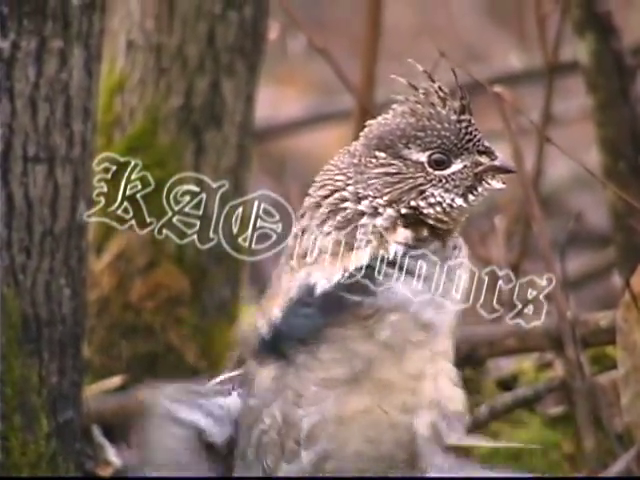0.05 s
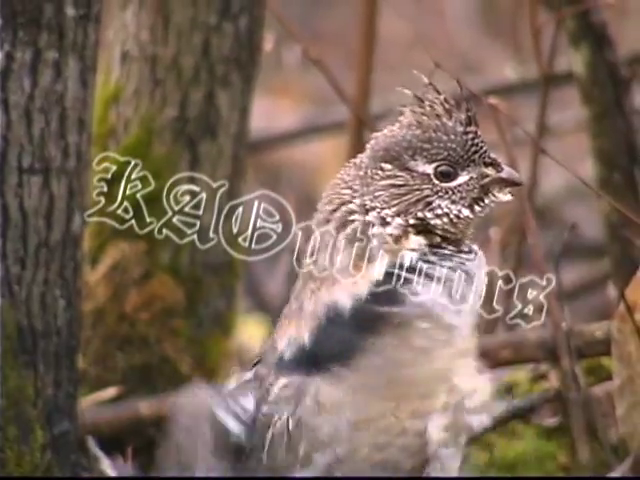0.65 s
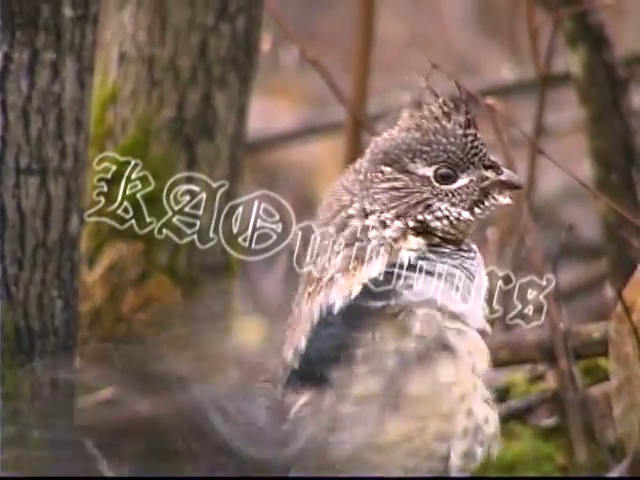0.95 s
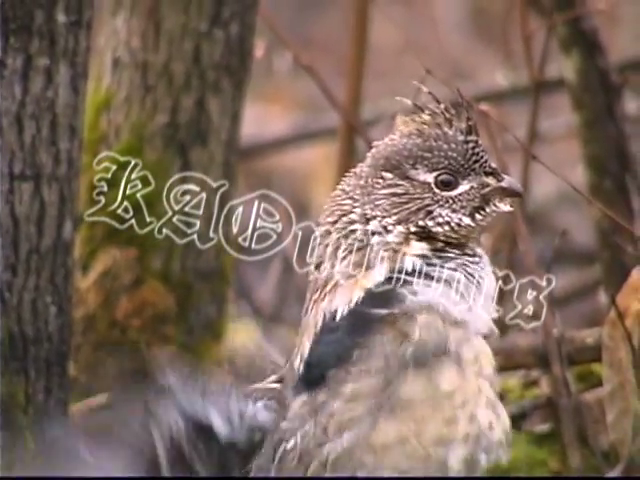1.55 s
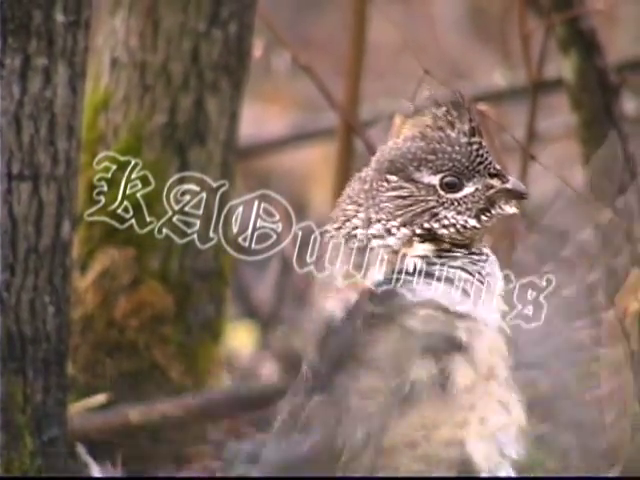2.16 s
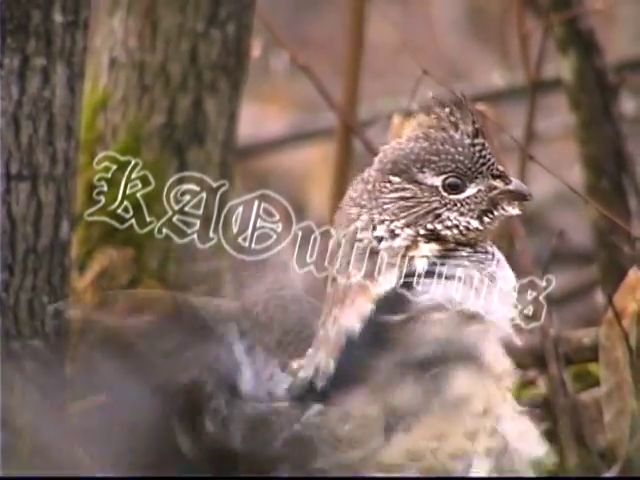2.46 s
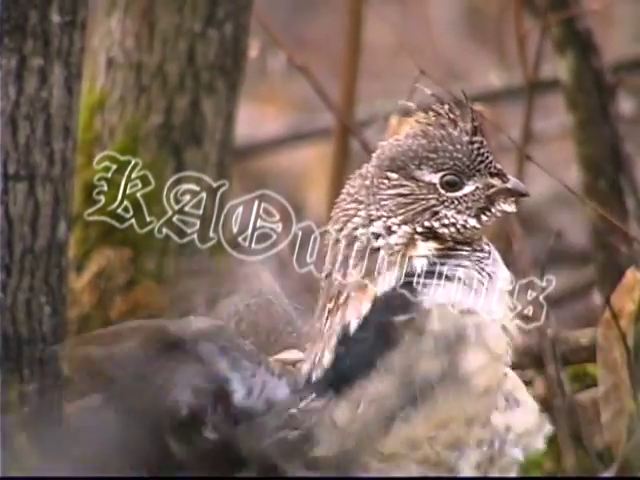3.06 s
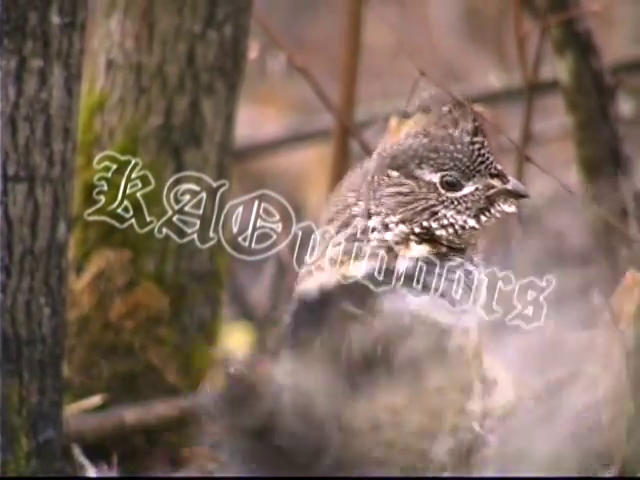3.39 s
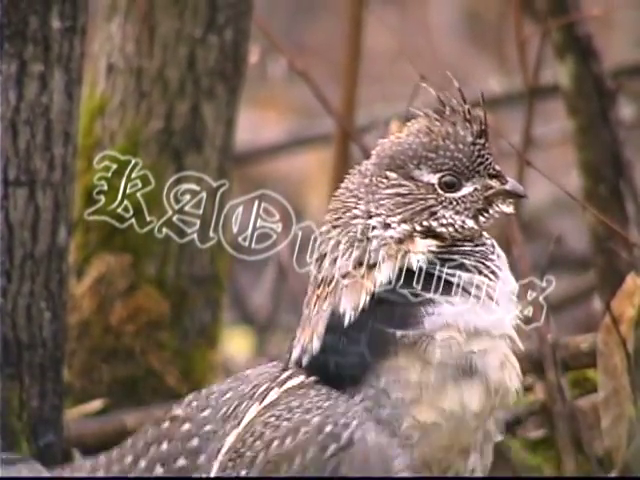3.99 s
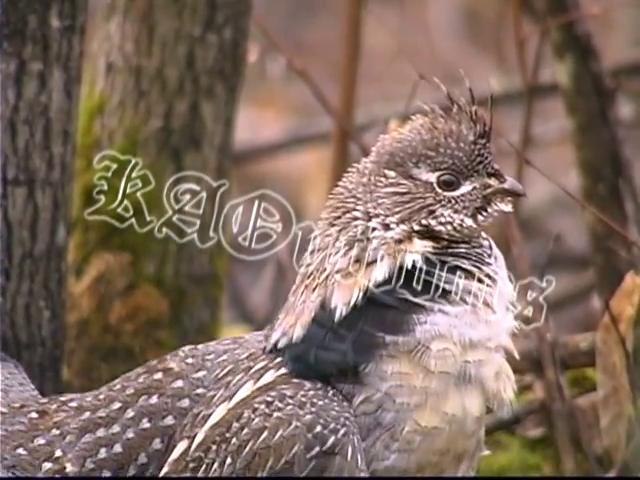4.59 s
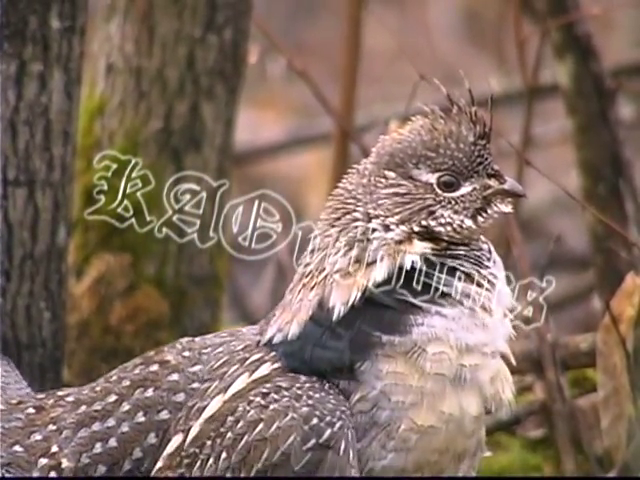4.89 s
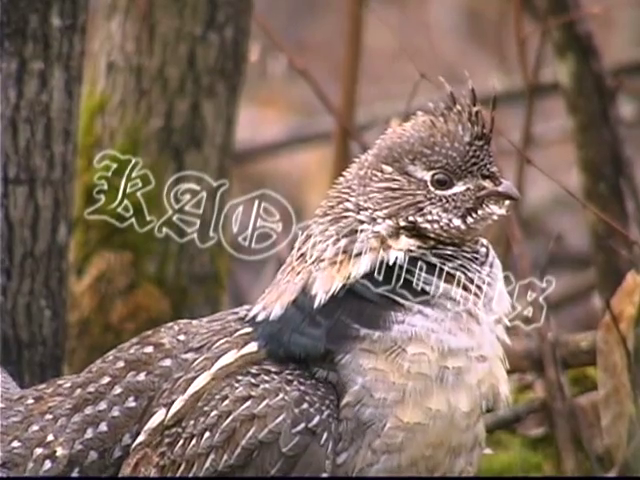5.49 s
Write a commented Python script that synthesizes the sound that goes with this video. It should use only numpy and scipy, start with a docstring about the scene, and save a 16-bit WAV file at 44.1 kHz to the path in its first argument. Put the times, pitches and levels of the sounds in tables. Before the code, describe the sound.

Low, spaced wing thumps with feathery swishes and slaps quicken into a whirring roll and stop, leaving a soft forest hush.

```python
"""A grouse drumming on a log

The bird is close by, a little to the right, in quiet woodland. Each wing stroke shoves the air into
a low thump, sheds a short swirl and hisses through the feathers; the wide, slow strokes end in a slap.
The beats speed into a whir, slow down and stop. Quills and dry leaves tick; trees echo faintly."""
import sys
import numpy as np
from scipy import signal
from scipy.fft import rfft, irfft
from scipy.io import wavfile
from scipy.ndimage import uniform_filter1d

SR = 44100
rng = np.random.default_rng(int(sys.argv[2]) if len(sys.argv) > 2 else 0)


def persist_wave(psi):
    """Save psi, clipped to +-1, as 16-bit WAV."""
    counts = np.round(np.clip(psi, -1, 1) * 32767).astype(np.int16)
    wavfile.write(sys.argv[1], SR, np.atleast_2d(counts).T)


N = 244314


def gain_of(db):
    """Turns decibels into a number to multiply a sound by."""
    return 10 ** (np.asarray(db) / 20)


def evened(x):
    """Scales a signal to an average (rms) size of one."""
    return x / np.sqrt(np.mean(x ** 2) + 1e-20)


def look_up(table, hz):
    """Reads a table at any frequency, sliding between its rows on a log scale."""
    row_hz, value = np.transpose(table)
    return np.interp(np.log(hz + 1), np.log(row_hz + 1), value)


def add(mix, start_s, sound):
    """Mixes a sound in at the given time."""
    part = mix[max(round(start_s * SR), 0):][:len(sound)]
    part += sound[:len(part)]


def bell(t, width):
    """A smooth hump around time zero."""
    return np.exp(-.5 * (t / width) ** 2)


def stereo_noise(tone, likeness):
    """Noise shaped by a tone table; a likeness of 1 makes left and right the same."""
    hz = np.fft.rfftfreq(N, 1 / SR)
    right, other = rfft(rng.standard_normal((2, N)))
    alike = np.clip(look_up(likeness, hz), 0, 1)
    left = alike * right + np.sqrt(1 - alike ** 2) * other
    return evened(irfft(np.array([left, right]) * gain_of(look_up(tone, hz)), N))


# The tone of the quiet woodland air: (frequency [Hz], level [dB])
AIR_TONE = [(15, -54), (25, -26), (64, -7), (80, -2.5), (254, 0), (282, -1.5), (589, -4), (971, -6.5),
            (1050, -7.5), (6630, -13.5), (13500, -17)]


def still_air():
    """The air of the wood is a soft, steady hush, slightly louder on the right."""
    hush = stereo_noise(AIR_TONE, likeness=[(60, 0.61), (300, 0.16), (8000, 0.22)])
    return gain_of(-58.5 + np.array([[1.7], [2.4]])) * hush


def pauses(count, shortest_s, growth_s, bend_s):
    """Seconds between strokes, growing longer the further they are from the fastest one."""
    steps = np.arange(count)
    return shortest_s + growth_s * steps + bend_s * steps ** 2


def stroke_times(fastest_s=2.6997, warm_up_s=.05714, warm_up_strokes=2.942):
    """The bird warms up with extra long pauses, speeds into a whir and tires."""
    before = pauses(20, shortest_s=.05296, growth_s=.005758, bend_s=.0000846)
    before += warm_up_s * np.exp(-np.arange(len(before))[::-1] / warm_up_strokes)
    after = pauses(12, shortest_s=.05972, growth_s=.003417, bend_s=.000257)
    return fastest_s + np.concatenate([-np.cumsum(before)[::-1], [0], np.cumsum(after)])


# How each part of a stroke grows and fades through the drum roll: (time [s], level [dB])
THUMP_LEVELS = [(.14, -17), (1.15, -17.5), (1.85, -20), (2.28, -19), (2.52, -20.5), (2.97, -23.2),
                (3.15, -21), (3.48, -19), (3.77, -25)]
SWIRL_LEVELS = [(.14, -35.5), (.95, -32.5), (1.4, -33), (2.15, -33), (2.55, -27), (2.8, -33), (3.3, -26.5),
                (3.77, -30)]
SWISH_LEVELS = [(.14, -34.5), (1.75, -35.5), (2.35, -38.6), (2.72, -37.5), (3.03, -38.9), (3.38, -37.1),
                (3.77, -39.2)]
SLAP_LEVELS = [(.14, -22.5), (1.05, -22.5), (1.75, -23), (2.05, -30.5), (2.3, -42), (3.1, -45), (3.24, -33),
               (3.45, -27.5), (3.77, -42)]
# Strokes that catch the air and go "whup": (time [s], thump change [dB], swirl boost [dB], pitch [Hz])
WHUPS = [(1.006, .6, 5, 334), (2.374, -6, 9.5, 466)]
# Strokes that land hard on the body: (time [s], slap boost [dB])
HARD_LANDINGS = [(2.45, 11), (2.588, 17.5), (2.822, 18.5)]


def wing_strokes():
    """Plans the time, strength and pitch of every stroke; no two are quite alike."""
    times = stroke_times()
    levels = THUMP_LEVELS, SWIRL_LEVELS, SWISH_LEVELS, SLAP_LEVELS
    thump_db, swirl_db, swish_db, slap_db = (np.interp(times, *np.transpose(rows)) for rows in levels)
    surge = bell(times - 2.675, width=0.031)  # at the climax the bird drives a couple of strokes harder
    thump_db += 5 * surge
    swirl_db += 8 * surge
    thump_luck, swirl_luck, slap_luck = rng.standard_normal((len(times), 3)).T
    thump_hz = (91.7 + 20 * surge) * np.exp(.02 * thump_luck)
    swirl_hz = (311 + 46 * times - 110 * surge) * np.exp(.072 * swirl_luck)  # tightens over the roll
    slap_delay_s = .0185 + .004 * np.exp(-times / .253) + .0003 * slap_luck  # first strokes land late
    for at, thump_change, swirl_boost, hz in WHUPS:
        nearest = np.argmin(abs(times - at))
        thump_db[nearest] += thump_change
        swirl_db[nearest] += swirl_boost
        swirl_hz[nearest] = hz
    for at, slap_boost in HARD_LANDINGS:
        slap_db[np.argmin(abs(times - at))] += slap_boost
    return [dict(time=at, thump_db=thump_db[i], thump_hz=thump_hz[i], swirl_db=swirl_db[i],
                 swirl_hz=swirl_hz[i], swish_db=swish_db[i], slap_db=slap_db[i],
                 landing=at + slap_delay_s[i]) for i, at in enumerate(times)]


def stroke_clock():
    """Seconds just before and after the fastest moment of a stroke."""
    return np.arange(-SR // 10, SR // 10) / SR


def thumps(strokes, lag_s=0.0019, rise_s=0.0044, fall_s=0.005, crest_s=0.00041, ring_hz=235):
    """The wings pull, shove and release the air: a short pressure wave with a brief hollow ring."""
    t, out = stroke_clock(), np.zeros(N)
    swell = bell(t - lag_s, np.where(t < lag_s, rise_s, fall_s))
    ring_age = np.maximum(t + 0.0025, 0)
    ring = gain_of(-15) * np.sin(2 * np.pi * ring_hz * ring_age) * np.exp(-ring_age / 0.013)
    for stroke in strokes:
        angle = 2 * np.pi * stroke["thump_hz"] * (t - crest_s)
        shove = swell * np.cos(angle - 0.27 * np.sin(2 * angle))  # bending the wave steepens it
        add(out, stroke["time"] + t[0], gain_of(stroke["thump_db"] + 2) * (shove + ring))
    return out


# How alike the wing noise is in both ears: (frequency [Hz], likeness [0 to 1])
WING_LIKENESS = [(100, 0.88), (1500, 0.99), (3000, 0.78), (6000, 0.78), (9000, 0.46), (12000, 0.3)]


def wing_noise(tone):
    """The steady noise from which flaps, swishes and the whir are shaped."""
    return stereo_noise(tone, WING_LIKENESS)


def swirls(strokes, lead_s=0.0028, whup_width_s=0.0022, flap_width_s=.0015):
    """A swirl of air rolls off the wing with a short hollow whup, and the feathers flap in it."""
    t, whups, flaps = stroke_clock(), np.zeros(N), np.zeros(N)
    for stroke in strokes:
        whup = bell(t + lead_s, whup_width_s) * np.sin(2 * np.pi * stroke["swirl_hz"] * (t + lead_s))
        add(whups, stroke["time"] + t[0], gain_of(stroke["swirl_db"] + 3) * whup)
        flap_db = (stroke["swirl_db"] + stroke["swish_db"]) / 2 + 2
        add(flaps, stroke["time"] + t[0], gain_of(flap_db) * bell(t + lead_s, flap_width_s))
    return whups + flaps * wing_noise(SLAP_TONE)


# The low tone of churned air: (frequency [Hz], level [dB])
GUST_TONE = [(40, -22), (100, -6.5), (170, 2), (250, -0.5), (450, -4), (700, -11.5), (1400, -17.5),
             (2500, -26.5), (6000, -42.5)]


def gusts(strokes, lead_s=0.0046, rise_s=0.0068, fall_s=0.018):
    """Churning air swells with each stroke and dies away behind the wing."""
    t, level = stroke_clock(), np.zeros(N)
    wake = np.exp(-abs(t + lead_s) / np.where(t < -lead_s, rise_s, fall_s))
    for stroke in strokes:
        gust_db = (stroke["thump_db"] + stroke["swirl_db"]) / 2 - 3.5
        add(level, stroke["time"] + t[0], gain_of(gust_db) * wake)
    return level * stereo_noise(GUST_TONE, likeness=[(100, 0.94), (2000, 0.99)])


# The bright tone of air rushing through feathers: (frequency [Hz], level [dB])
SWISH_TONE = [(100, -26), (400, 7), (800, 0.5), (1400, 5), (2400, -1.5), (3600, -3), (4800, -0.5),
              (7800, 1), (9500, -6), (12000, -11), (13500, -44.5)]


def feathers(strokes, lead_s=0.0041, rise_s=0.0059, fall_s=0.014, fold_s=.015, fold_width_s=0.0056):
    """Air hisses through the feathers at top speed; they brush again as the wing folds."""
    t, level = stroke_clock(), np.zeros(N)
    sweep = np.exp(-abs(t + lead_s) / np.where(t < -lead_s, rise_s, fall_s))
    brush = 0.28 * bell(t - fold_s, fold_width_s)
    stopping = bell(np.maximum(t - fold_s, 0), 2 * fold_width_s)
    rustle = 0.072 * bell(t, width=0.042)
    swish = (sweep + brush) * stopping + rustle
    for stroke in strokes:
        add(level, stroke["time"] + t[0], gain_of(stroke["swish_db"] + 3) * swish)
    grain_db = 3 * evened(uniform_filter1d(rng.standard_normal(N), size=30))  # tiny barbs catch and slip
    return level * evened(gain_of(grain_db) * wing_noise(SWISH_TONE))


def crack(tone, size=2048):
    """The shortest click that starts suddenly and has the given tone, with a peak of one."""
    hz = abs(np.fft.fftfreq(size, 1 / SR))
    log_gain = np.log(gain_of(look_up(tone, hz)))
    spectrum = np.exp(np.conj(signal.hilbert(log_gain)))  # packs the energy at the start
    pulse = np.fft.ifft(spectrum).real[:size // 2]
    return pulse / abs(pulse).max()


# The tone of a wing slapping or flapping: (frequency [Hz], level [dB])
SLAP_TONE = [(60, -31), (180, 3.5), (380, 4.5), (750, -3.5), (1350, -2), (1900, -9), (2600, -24),
             (3600, -13), (5000, -10), (8000, -31), (13000, -45)]


def slaps(strokes, suck_lead_s=0.00024, tip_lead_s=0.0022, spray_decay_s=0.0005):
    """The wing meets the body, tips first: a quick suck of air, a crack and a spray of quill noise."""
    t, hits, spray = np.arange(SR // 50) / SR, np.zeros(N), np.zeros(N)
    pulse = crack(SLAP_TONE)
    suck = -0.83 * signal.windows.hann(14)
    fade = np.exp(-t / spray_decay_s)
    for stroke in strokes:
        landing = stroke["landing"]
        hit_gain, spray_gain = gain_of(stroke["slap_db"] + 6), gain_of(stroke["slap_db"] - 7)
        tip_early, tip_size = rng.uniform(0.99, 1.4, 2)
        add(spray, landing - tip_lead_s * tip_early, tip_size * spray_gain * fade ** 2)
        add(hits, landing - suck_lead_s * 1.83, hit_gain * suck)
        add(spray, landing - suck_lead_s, spray_gain * fade)
        add(hits, landing - suck_lead_s / 2, hit_gain * pulse)
    return hits + spray * wing_noise(SWISH_TONE)


# The tone of the echo from the trees: (frequency [Hz], level [dB])
ECHO_TONE = [(50, -35), (100, -30), (170, -15), (350, -11), (700, -10), (1500, -15), (3500, -13.5),
             (8000, -17.5), (13000, -9.5)]
# How long the echo lasts: (frequency [Hz], time to fade by 60 dB [s])
ECHO_FADE = [(80, 0.11), (300, 0.46), (1000, 0.25), (4000, 0.32), (12000, 0.86)]
# How alike the echo is in both ears: (frequency [Hz], likeness [0 to 1])
ECHO_LIKENESS = [(100, 0.98), (500, 0.96), (1500, 1), (4000, 0.47), (12000, 0.67)]


def tree_echo(sound, build_s=0.0073, echoes_per_s=2500):
    """Trunks scatter the sound back as many tiny echoes; each frequency dies at its own speed."""
    echoes = rng.standard_normal((2, SR)) * (rng.random((2, SR)) < echoes_per_s / SR)
    hz, t, (right, other) = signal.stft(echoes, SR, nperseg=512)
    alike = np.clip(look_up(ECHO_LIKENESS, hz), 0, 1)[:, None]
    left = alike * right + np.sqrt(1 - alike ** 2) * other
    fade = gain_of(-60 * t / look_up(ECHO_FADE, hz)[:, None]) * (1 - bell(t, build_s))
    fade *= gain_of(look_up(ECHO_TONE, hz))[:, None] / np.sqrt(np.mean(fade ** 2, 1, keepdims=True))
    tail = signal.istft(np.array([left, right]) * fade, SR, nperseg=512)[1] / np.linalg.norm(echoes[0])
    return signal.fftconvolve(sound.mean(0)[None], tail, axes=1)[:, :N]


def blended_echo(sound, turn_s=.31, tails=3):
    """The echo blends slowly between a few tails, so it sounds slightly different after each stroke."""
    angle = np.pi * (np.arange(N) / SR / turn_s + np.arange(tails)[:, None] / tails)
    return sum(tree_echo(sound * share) for share in np.sqrt(2 / tails) * np.sin(angle))


# Small ticks of quills and dry leaves: (time [s], level [dB], pitch [Hz], fade time [s])
TICKS = [(0.4057, -24.5, 6150, 0.0011), (0.4607, -44, 7000, 0.0026), (0.5334, -52, 3500, .002),
         (0.669, -45, 6000, .002), (0.7307, -38.5, 5200, 0.0019), (1.1027, -49, 7500, 0.0028),
         (2.772, -32, 6960, 0.0027), (4.076, -54, 7000, 0.0064), (4.251, -58, 6800, .008),
         (4.295, -59, 4700, .006), (4.9581, -51, 7000, 0.0027), (4.989, -60, 7200, .008)]


def ticks(sharpness=1.36):
    """Quills and dry leaves tick as the bird moves: tiny bursts of noise, each around one pitch."""
    t, out = np.arange(SR // 20) / SR, np.zeros(N)
    for at, db, hz, fade_s in TICKS:
        band = signal.iirpeak(hz, sharpness, SR)
        scrape = signal.lfilter(*band, signal.lfilter(*band, rng.standard_normal(len(t))))
        add(out, at, gain_of(db) * evened(scrape) * np.exp(-t / fade_s))
    return out


def whir(peak_s=2.706, width_s=0.24, churn_db=-37, hiss_db=-43):
    """At the fastest beats, the air and the feathers no longer come to rest between strokes."""
    swell = bell(np.arange(N) / SR - peak_s, width_s)
    churn = gain_of(churn_db) * wing_noise(GUST_TONE)
    hiss = gain_of(hiss_db) * wing_noise(SWISH_TONE)
    return swell * (churn + hiss)


# Which side the bird is heard on: (frequency [Hz], left level minus right level [dB])
BIRD_BALANCE = [(60, -4), (110, -6), (220, -10), (370, -6.5), (670, -2.5), (1230, -5.5), (2240, -3),
                (4100, -1), (7500, -0.5), (10000, 8.5), (13000, 6)]


def place_bird(sound):
    """Sets the bird a little to the right; only its highest hiss leans left."""
    balance_db = look_up(BIRD_BALANCE, np.fft.rfftfreq(N, 1 / SR))
    sides = gain_of(np.outer([.5, -.5], balance_db))
    return irfft(rfft(sound) * sides / sides.mean(0), N)


def scene():
    """The bird, its echo and the still air of the wood."""
    strokes = wing_strokes()
    bird = thumps(strokes) + swirls(strokes) + gusts(strokes) + feathers(strokes)
    bird += whir() + slaps(strokes) + ticks()
    echo = gain_of(0.5) * blended_echo(bird)
    return place_bird(bird + echo) + still_air()


def record(dry, low_cut_hz=30, high_cut_hz=13500):
    """Trims away the deepest bass and the highest treble."""
    hz = np.fft.rfftfreq(N, 1 / SR)
    trimmed = irfft(rfft(dry) * hz ** 4 / (hz ** 4 + low_cut_hz ** 4), N)
    treble_cut = signal.firwin(511, high_cut_hz, window=("kaiser", 9), fs=SR)
    return signal.oaconvolve(trimmed, treble_cut[None], "same")


dry = scene()
out = record(dry)
persist_wave(out)
```